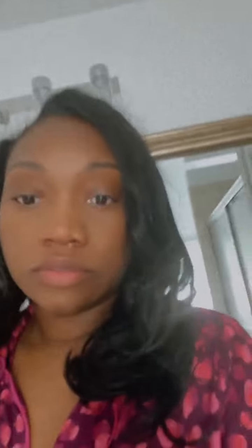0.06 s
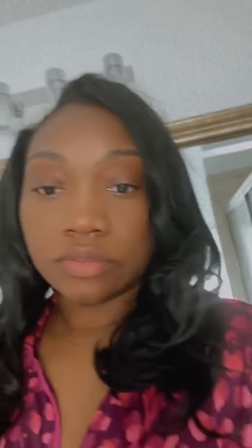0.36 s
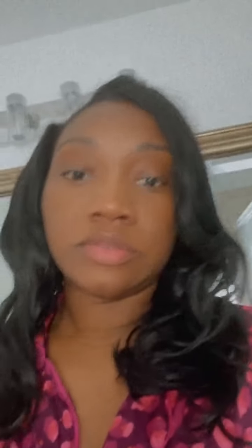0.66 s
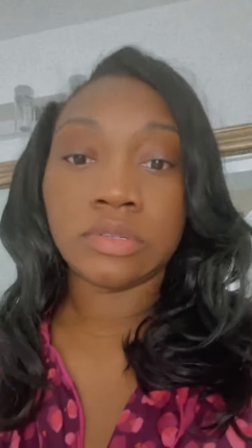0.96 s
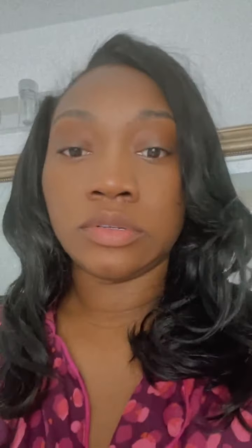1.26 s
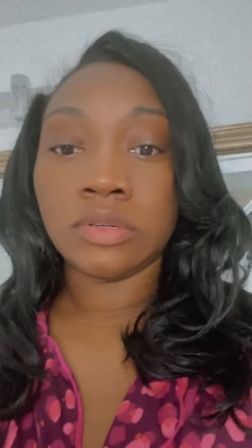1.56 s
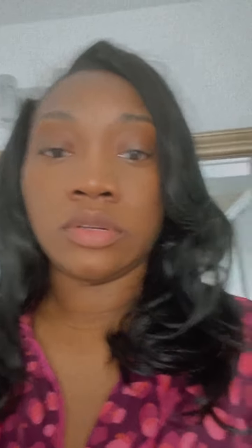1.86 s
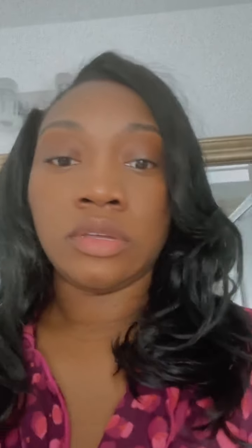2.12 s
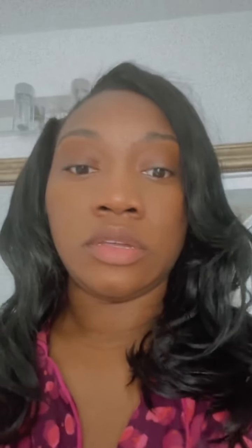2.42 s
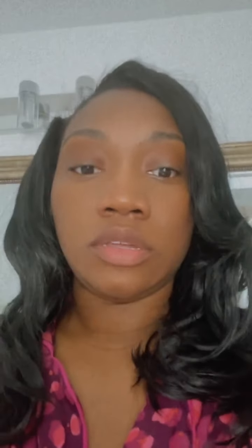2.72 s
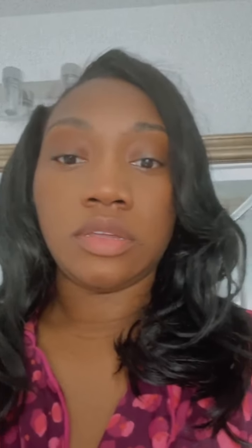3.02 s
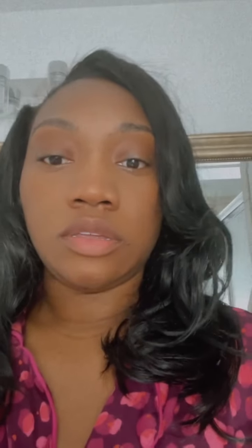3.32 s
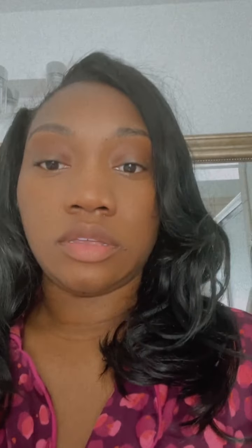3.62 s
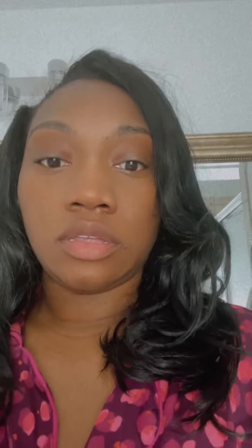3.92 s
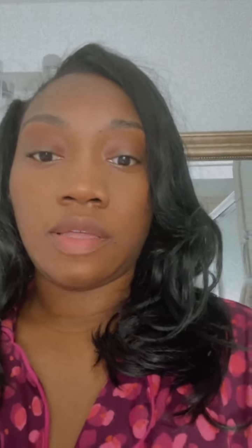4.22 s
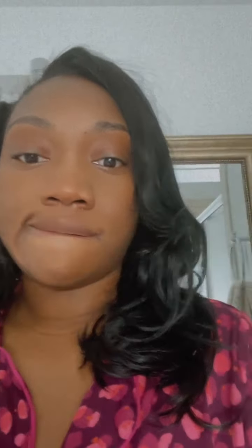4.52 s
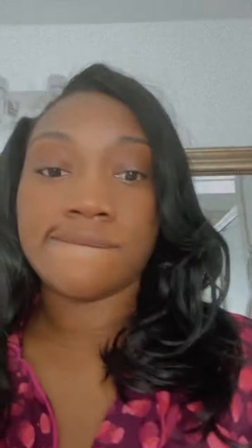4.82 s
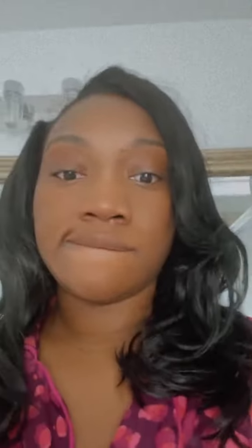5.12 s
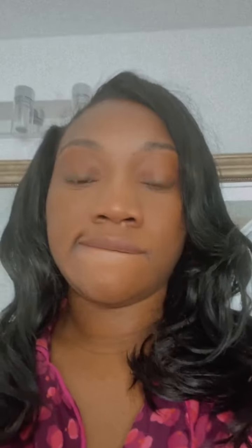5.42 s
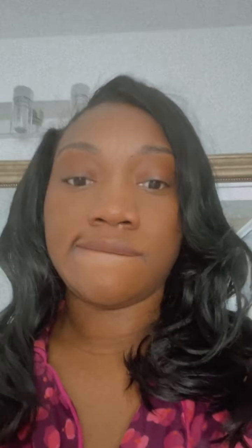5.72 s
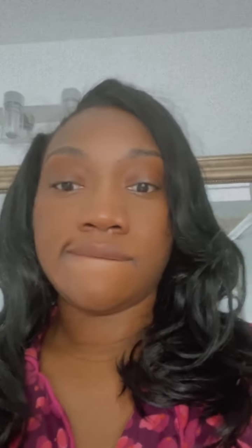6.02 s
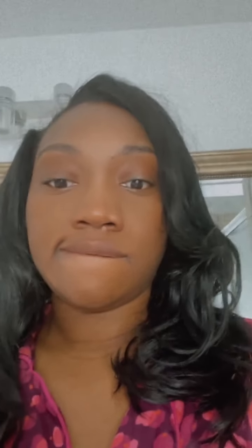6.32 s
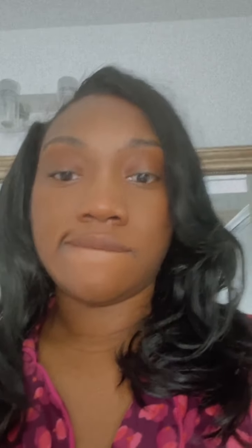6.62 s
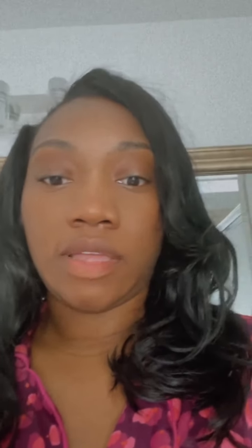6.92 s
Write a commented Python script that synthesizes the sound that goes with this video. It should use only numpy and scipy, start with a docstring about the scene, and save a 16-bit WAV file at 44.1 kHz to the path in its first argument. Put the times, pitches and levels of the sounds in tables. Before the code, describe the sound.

A phone is handled right at its own microphone. Fingertips knock and slide on the case at irregular moments, and about seven sharp clicks stand out, each with a small thump and a bright edge. The handling pauses briefly around the middle, resumes, then fades to light taps. A faint hiss with tiny ticks runs underneath in the quiet small room.

```python
"""Fingers shift their grip on a phone: fingertips tap and rub the case, and something on it clicks sharply.
Each hit travels through the phone's body to the microphone, ringing it from a low thump to a bright top.
The hand rumbles, and a few soft, airy swells of hiss come and go in a quiet small room.
Behind it all, a faint hiss flutters, ticks and pips thirty times a second."""
import sys
import numpy as np
from scipy import signal
from scipy.io import wavfile

SR = 44100
rng = np.random.default_rng(int(sys.argv[2]) if len(sys.argv) > 2 else 0)


def master(y):
    """Save y as 16-bit WAV."""
    cut = np.clip(np.atleast_2d(y).T, -1, 1)
    pcm = np.round(cut * 32767)  # scale
    wavfile.write(sys.argv[1], SR, pcm.astype(np.int16))


N = 311787
TIME = np.arange(N) / SR


def from_db(db):
    """Decibels to gain."""
    return 10 ** (np.asarray(db) / 20)


def rms_one(x):
    """Scale to rms 1."""
    return x / np.sqrt(np.mean(x ** 2) + 1e-20)


def drift(rate_hz):
    """Random modulator of rms 1 that glides to a new value rate_hz times a second."""
    knots = rng.standard_normal(4096)
    return rms_one(np.interp(TIME * rate_hz, np.arange(len(knots)), knots))


def soften(x, top_hz):
    """Steep low-pass: the dullness of a soft contact."""
    return signal.sosfilt(signal.butter(4, top_hz, fs=SR, output="sos"), x)


def resonate(x, modes, stretch=1):
    """Damped resonators in parallel, transposed by stretch, each run twice for steep skirts."""
    out = 0
    for hz, width_hz, db in modes:
        b, a = signal.iirpeak(hz * stretch, hz / width_hz, fs=SR)
        out = out + from_db(db) * signal.lfilter(b, a, signal.lfilter(b, a, x))
    return out


def noise_bands(spectrum):
    """Centre frequencies and third-octave noise bands that follow an EQ curve and sum to rms 1."""
    edges = np.geomspace(22, 17000, 30)
    centres = np.sqrt(edges[1:] * edges[:-1])
    curve_hz, curve_db = np.transpose(spectrum)
    gains = from_db(np.interp(np.log(centres), np.log(curve_hz), curve_db))
    white = rng.standard_normal((2, N))
    filters = [signal.butter(2, band, "band", fs=SR, output="sos") for band in zip(edges, edges[1:])]
    bands = np.array([gains[k] * signal.sosfilt(sos, white[k % 2]) for k, sos in enumerate(filters)])
    return centres, bands / bands.sum(0).std()


def strokes(table, attack_s, release_s, swell_db):
    """Cue envelopes: each fades in, moves by swell_db to its end level, and fades out."""
    power = np.zeros(N)
    for s, length, db in table:
        early, late = np.maximum(s - TIME, 0), np.maximum(TIME - s - length, 0)
        to_go = 1 - np.clip((TIME - s) / length, 0, 1)
        fades = np.exp(-early / attack_s - late / release_s)
        power += (from_db(db - swell_db * to_go) * fades) ** 2
    return np.sqrt(power)


def diffuse_tail(x, t60_s, db, low_hz, size=12000):
    """Effects send: a dense, decaying noise tail with the bass rolled off."""
    tail = rng.standard_normal(size) * from_db(-60 * TIME[:size] / t60_s)
    tail = signal.sosfilt(signal.butter(2, low_hz, "high", fs=SR, output="sos"), tail)
    return from_db(db) * signal.fftconvolve(x, tail / np.linalg.norm(tail))[:N]


# EQ curve of the hiss (frequency [Hz], relative level [dB])
HISS_EQ = [(30, -12.5), (70, 11), (200, 2), (330, 2.5), (550, -3.5), (800, 0.5), (1300, 2.5), (2000, -3.5),
           (3000, -9.5), (3700, -2.5), (5000, -9), (6500, 2.5), (7300, 4), (8800, -4.5), (10000, -16),
           (12000, -19.5), (13500, -34), (16000, -29.5)]
# swells in each cycle (time in cycle [s], half-width [s], centre [Hz], spread [octaves], boost [dB])
FLUTTER = [(0.014, 0.0021, 1270, 1.23, 9.5), (0.016, 0.018, 2593, 1, 5), (0.018, .006, 8980, 1, 4)]
FLUTTER_HZ = 30

def hiss(level_db=-58, uneven=0.59):
    """A bed of hiss with a slight regular flutter, no two swells quite as strong."""
    centres, bands = noise_bands(HISS_EQ)
    boost_db = 0
    for moment, half_width, hz, spread, db in FLUTTER:
        offset_s = (((TIME - moment) * FLUTTER_HZ + .5) % 1 - .5) / FLUTTER_HZ
        swell_db = db * np.exp(-(offset_s / half_width) ** 2) * (1 + uneven * drift(120))
        bell = np.exp(-(np.log2(centres / hz) / spread) ** 2)
        boost_db = boost_db + np.outer(bell, swell_db)
    return from_db(level_db) * rms_one((bands * from_db(boost_db)).sum(0))


def crackle(drive_db=-46, spread_db=3.5, moment_s=0.012, jitter_s=0.0069, low_hz=900, top_hz=9000):
    """One tiny tick per flutter cycle, loose in strength and timing."""
    cycles = np.arange(0, TIME[-1] - 1 / FLUTTER_HZ, 1 / FLUTTER_HZ)
    late, force = rng.standard_normal((len(cycles), 2)).clip(-2, 2).T
    starts = ((cycles + moment_s + jitter_s * late) * SR).astype(int)
    ticks = np.full(N, 1e-18)
    ticks[starts] = from_db(drive_db + spread_db * force)
    band = signal.butter(1, [low_hz, top_hz], "band", fs=SR, output="sos")
    return soften(signal.sosfilt(band, ticks), top_hz)


# pip automation (time [s], pitch [Hz], random hop [Hz], level [dB])
PIPS = [(0, 4180, 500, -60), (0.401, 5130, 80, -51), (0.749, 5140, 80, -64), (0.899, 4120, 550, -63),
        (5.5, 4225, 550, -66), (5.65, 5180, 100, -58.5), (7.07, 4750, 452, -61)]

def pips(moment_s=0.006, half_width_s=0.003, fall_hz_per_s=40000, uneven_db=2.5):
    """A faint, falling electrical pip opens each flutter cycle, now steady, now hopping in pitch."""
    times, *columns = np.transpose(PIPS)
    pitch_hz, hop_hz, db = [np.interp(TIME, times, column) for column in columns]
    cycle = (TIME * FLUTTER_HZ).astype(int)
    hop, force = rng.standard_normal((2, N))[:, cycle].clip(-2, 2)
    offset_s = TIME % (1 / FLUTTER_HZ) - moment_s
    hz = pitch_hz + hop_hz * hop - fall_hz_per_s * offset_s
    envelope = from_db(db + uneven_db * force) * np.exp(-(offset_s / half_width_s) ** 2)
    return envelope * np.sin(2 * np.pi * np.cumsum(hz) / SR)


# EQ curve of the airy swells (frequency [Hz], relative level [dB])
AIR_EQ = [(300, -1), (1000, 0), (1600, 2), (2800, -5), (5000, -6.5), (6400, 1.5), (8000, -1), (9200, -12.5),
          (11500, -26.5), (13500, -25)]
# airy swells (time [s], length [s], end level [dB])
AIR_SWELLS = [(0.04, 0.24, -58), (0.35, 0.34, -57.5), (5.7, 0.096, -58.5), (5.95, 0.11, -63)]

def airy_swells(grain_db=5.0):
    """Soft, airy swells of hiss with a fine grain."""
    _, bands = noise_bands(AIR_EQ)
    air = rms_one(bands.sum(0) * from_db(grain_db * drift(250)))
    return strokes(AIR_SWELLS, attack_s=0.047, release_s=0.08, swell_db=-3.5) * air


# fader ride for the hand's small, unceasing movements (time [s], level [dB])
RESTLESS = [(0.0, -59), (0.41, -59.5), (1.14, -54), (1.5, -64.5), (2.38, -60), (3.31, -69.5), (6.75, -61),
            (7.07, -62.5)]

def restless_db(s):
    """How much the hand stirs at time s; drives rumble, skin creep and light touches."""
    return np.interp(s, *np.transpose(RESTLESS))


# bumps from the hand (time [s], length [s], end level [dB])
JOLTS = [(0.005, 0.058, -44.5), (0.13, 0.1, -52), (0.91, 0.038, -53), (1.86, 0.013, -42),
         (2.255, 0.017, -53), (6.29, 0.025, -48), (6.79, 0.042, -52)]

def hand_rumble(lump_db=3.5):
    """Lumpy low end: the hand sways the whole phone and now and then jolts it."""
    lumps = from_db(lump_db * drift(20))
    sway = resonate(rng.standard_normal(N), [(55, 46, 0.5), (121, 140.5, -26.5)])
    sway = soften(sway, top_hz=214.6)
    jolts = strokes(JOLTS, attack_s=0.015, release_s=0.018, swell_db=3.5)
    return rms_one(sway * lumps) * from_db(restless_db(TIME)) + rms_one(sway) * jolts


# the case's high ring, also struck by taps and clicks (frequency [Hz], width [Hz], gain [dB])
RING = [(6440, 1100, 1)]
# one swish, then two brief rings (time [s], length [s], end level [dB])
BRIGHT_ACCENTS = [(0.885, 0.065, -58.5), (2.341, 0.0069, -53), (2.997, 0.007, -56.5)]

def bright_accents(grain_db=6.0):
    """Grainy noise through high resonances: one short bright swish, and a brief high ring on two taps."""
    grains = rng.standard_normal(N) * from_db(grain_db * drift(300))
    sheen = rms_one(resonate(grains, RING + [(8200, 2400, -11.5)]))
    return strokes(BRIGHT_ACCENTS, attack_s=0.002, release_s=0.013, swell_db=-8) * sheen


# skin slides on the case (time [s], length [s], end level [dB])
SLIDES = [(0.02, 0.014, -47.5), (0.49, 0.085, -52.5), (0.61, 0.13, -52), (0.87, 0.088, -48),
          (1.05, 0.14, -42.5), (1.8, 0.088, -56.5), (2.24, 0.106, -55.5), (4.78, 0.088, -57),
          (5.36, 0.014, -49.5), (5.93, 0.036, -44.5), (6.78, 0.013, -51)]

def rubbing(slips_per_s=2000, uneven_db=3, settle_db=-54, settle_s=0.06):
    """Skin sticks and slips, sounding the case's mids: in slides, after clicks, and faintly throughout."""
    slips = (rng.random(N) < slips_per_s / SR) * rng.standard_normal(N) + 1e-18
    case = resonate(slips, [(616, 280, 3.5), (523, 150, -10.5), (230, 260, -27.5)])
    texture = rms_one(soften(case, top_hz=850) * from_db(uneven_db * drift(70)))
    sliding = strokes(SLIDES, attack_s=0.017, release_s=0.0086, swell_db=4)
    fades = sum((TIME > s) * np.exp(-np.abs(TIME - s) / settle_s) for s, *_ in CLICKS)
    settling = from_db(settle_db) * fades
    creeping = from_db(restless_db(TIME) - 4.5)
    return np.linalg.norm([sliding, settling, creeping], axis=0) * texture


def dispersed_blow(lag_hz=(62, 193), q=0.75, size=6000):
    """The exciter: the case holds an impulse back around lag_hz, so every hit chirps downward."""
    blow = signal.unit_impulse(size) + 1e-18
    for hz in lag_hz:
        b, a = signal.iirpeak(hz, q, fs=SR)
        blow = signal.lfilter(2 * b - a, a, blow)   # all-pass
    return soften(blow, top_hz=13500)


# the phone's low thump and mid knock, before the grip retunes them (frequency [Hz], width [Hz], gain [dB])
THUMP = [(60.66, 66, 8.5), (115, 118.5, 3.5), (229, 280, -3.5)]
KNOCK = [(697, 384, 10.5), (511.5, 160, -16.5)]

def strikes(table, blow, knock_hz, colours, knock_tracking=0.23, dulling_octaves_per_db=0.0636):
    """Each hit stacks a thump, a knock and the given colours; a firmer grip tunes the first two up."""
    out = np.zeros(N)
    for s, grip_hz, *peaks_db in table:
        thump_stretch = grip_hz / THUMP[0][0]
        knock_stretch = knock_hz / KNOCK[0][0] * thump_stretch ** knock_tracking
        _, knock_db, rim_db, *_ = peaks_db
        # less rim than knock means a softer contact, so a duller knock
        hardness = 2 ** (dulling_octaves_per_db * min(rim_db - knock_db, 0))
        thump = soften(resonate(blow, THUMP, thump_stretch), top_hz=370 * thump_stretch)
        knock = -soften(resonate(blow, KNOCK, knock_stretch), top_hz=1078 * knock_stretch * hardness)
        layers = [thump, knock] + colours
        hit = sum(from_db(db) * layer / np.abs(layer).max() for db, layer in zip(peaks_db, layers))
        start = round(s * SR)
        out[start:start + len(hit)] += hit[:N - start]
    return out


def light_touches(count=16, grip_hz=65, thump_knock_rim_db=(2.5, 12, 0)):
    """Extra tap rows: faint touches at random times, their levels riding on the hand's restlessness."""
    times = rng.random(count) * TIME[-1]
    return [(s, grip_hz, *(restless_db(s) + np.array(thump_knock_rim_db))) for s in times]


# the rim's upper mids, also struck by clicks (frequency [Hz], width [Hz], gain [dB])
RIM = [(1003, 830, 10.1), (1465, 350, 1.2)]
# finger taps (time [s], grip pitch [Hz], thump peak [dB], knock peak [dB], rim peak [dB])
TAPS = [(0.0576, 46.6, -45.5, -45, -34), (0.1401, 45.7, -52, -44.5, -42.5), (0.2136, 54.7, -49, -31, -39),
        (0.2706, 42, -58, -68, -36), (0.4214, 65.7, -45, -34, -39.5), (0.6096, 84, -40, -37, -54),
        (0.8802, 46.3, -37.5, -33.5, -46), (1.1678, 91, -45, -32, -52), (1.2119, 81, -51, -38, -52),
        (1.2659, 74.4, -62, -41, -63), (1.4129, 90, -53, -36.5, -50), (1.4602, 91, -41.5, -48, -58),
        (1.6454, 87, -37.5, -21, -26), (1.7038, 67, -54, -42, -50), (1.7349, 66, -59, -38.5, -48.5),
        (2.0352, 65.6, -45.5, -23.5, -28), (2.1047, 65.5, -54, -43, -49), (2.3414, 59, -35.5, -30.5, -37.5),
        (2.5186, 59.3, -46.5, -29.5, -36), (2.5929, 49.8, -64, -44.5, -47.5),
        (2.7432, 88, -21.5, -29.5, -46), (2.7672, 59.4, -41, -29.5, -38), (2.8688, 50, -66, -44, -58),
        (2.8829, 60, -57, -40, -42.5), (2.9976, 43.8, -40.5, -32.5, -39), (4.3022, 90, -45, -30.5, -48.5),
        (4.3753, 69.2, -49, -35.5, -42), (4.5636, 53.6, -55, -47.5, -56), (4.6977, 90, -44, -27.5, -29.5),
        (4.7492, 70, -51, -41, -53), (4.8306, 46, -52.5, -45, -52), (5.049, 45.8, -47, -38.5, -44.5),
        (5.2651, 70, -46.5, -32, -37), (5.3355, 70, -62, -45, -56), (5.3737, 83.5, -57, -37, -45.5),
        (5.6032, 46, -53.5, -35.5, -37.5), (6.2748, 46, -48.5, -29.5, -35.5),
        (6.6087, 50.6, -60, -37.5, -42.5), (6.7177, 46, -73, -45, -49), (6.9413, 45, -55, -36.5, -44.5)]

def taps(ring_below_rim_db=10.5, hollow_below_knock_db=9):
    """Soft fingertips sound the low resonances, a little ring and the case's lingering hollow note."""
    blow = dispersed_blow()
    rim = soften(resonate(blow, RIM), top_hz=1100)
    ring = resonate(blow, RING)
    hollow = resonate(blow, [(536, 120, 0)])
    cues = [(*tap, knock_db, rim_db, rim_db - ring_below_rim_db, knock_db - hollow_below_knock_db)
            for *tap, knock_db, rim_db in list(TAPS) + light_touches()]
    return strikes(cues, blow, knock_hz=604, colours=[rim, ring, hollow])


# the bright resonances that give a click its edge (frequency [Hz], width [Hz], gain [dB])
CRACK = [(2346, 700, -1.5)]
TICK = [(3416, 710, 0)]
SPARKLE = [(8100, 600, 5.5), (8990, 480, 4), (10250, 3000, -6), (13420, 500, -21)]
# sharp clicks (time [s], grip pitch [Hz], thump peak [dB], knock peak [dB], rim peak [dB],
# crack peak [dB], tick peak [dB], ring peak [dB], sparkle peak [dB])
CLICKS = [(0.236, 43.5, -52, -24.5, -25, -34, -33, -29.5, -46),
          (1.3203, 84, -30, -5, -12.5, -22.5, -18.5, -7, -23),
          (1.6526, 71, -33.5, -9.5, -16, -23.5, -21, -11.5, -25),
          (2.7941, 89, -39, -11.5, -16, -37, -23, -21.5, -27.5),
          (4.319, 91, -34.5, -11.5, -18, -25, -23.5, -16, -36),
          (4.7139, 93, -36.5, -14, -19.5, -34, -29, -24.5, -31),
          (5.2886, 62, -47, -14, -13.5, -40, -21.5, -22.5, -38)]

def clicks():
    """Hard clicks ring the phone from its low thump right up to the sparkle."""
    blow = dispersed_blow()
    rim = soften(resonate(blow, RIM), top_hz=1500)
    bright = [resonate(blow, modes) for modes in (CRACK, TICK, RING, SPARKLE)]
    return strikes(CLICKS, blow, knock_hz=606, colours=[rim] + bright)


def scene():
    """Mono mix: hits, each with a very short bright fizz and a faint room tail, over rub, rumble and hiss."""
    hits = clicks() + taps()
    fizz = diffuse_tail(hits, t60_s=0.012, db=-9.5, low_hz=1491)
    room = diffuse_tail(hits, t60_s=0.2024, db=-44.0, low_hz=400)
    handling = hits + fizz + room + rubbing() + bright_accents() + hand_rumble()
    return (handling + airy_swells() + hiss() + crackle() + pips())[None]


# notches of the microphone port (frequency [Hz], width [Hz], depth [0-1])
PORT_DIPS = [(2000, 220, 0.06), (4855, 180, 0.06), (7926, 1200, 0.76)]

def record(dry, cutoff_hz=15800):
    """The microphone port colours the treble, and a steep low-pass takes off the top."""
    for hz, width_hz, depth in PORT_DIPS:
        b, a = signal.iirpeak(hz, hz / width_hz, fs=SR)
        dry = dry - depth * signal.lfilter(b, a, dry)
    return signal.sosfilt(signal.ellip(10, .1, 80, cutoff_hz, fs=SR, output="sos"), dry)


dry = scene()
out = record(dry)
master(out)
```